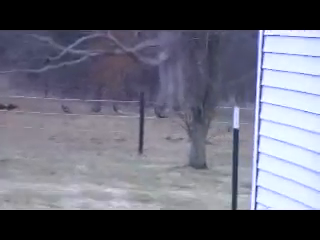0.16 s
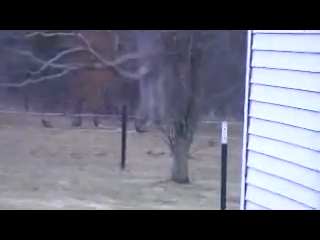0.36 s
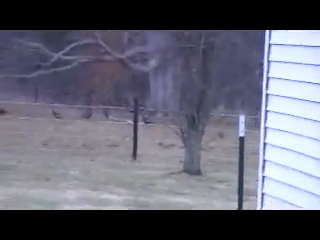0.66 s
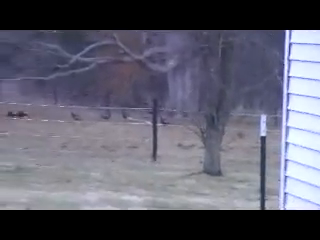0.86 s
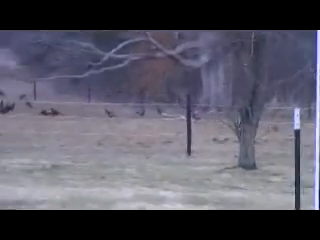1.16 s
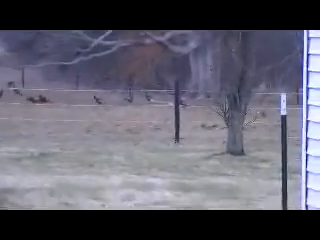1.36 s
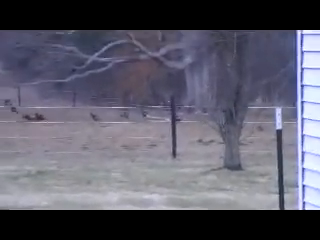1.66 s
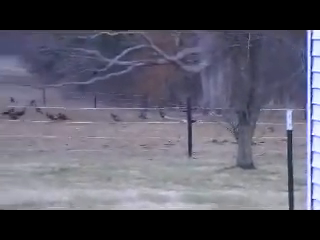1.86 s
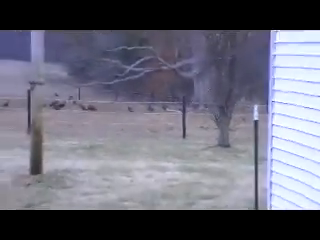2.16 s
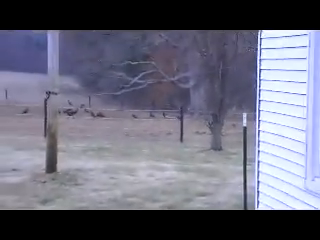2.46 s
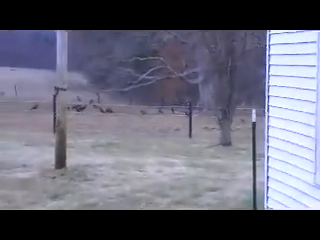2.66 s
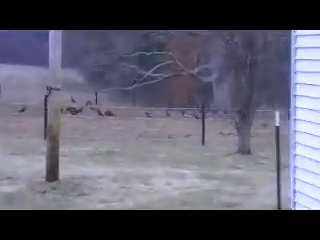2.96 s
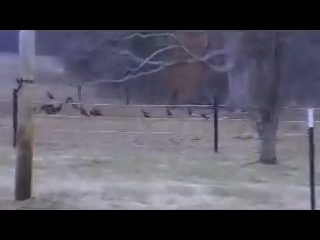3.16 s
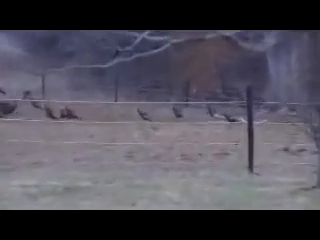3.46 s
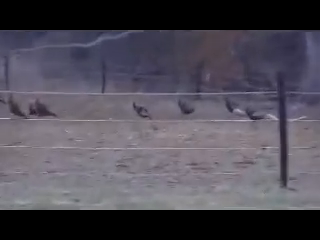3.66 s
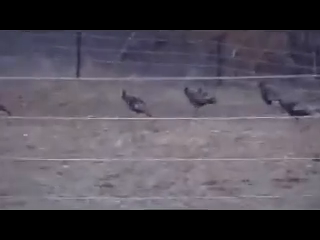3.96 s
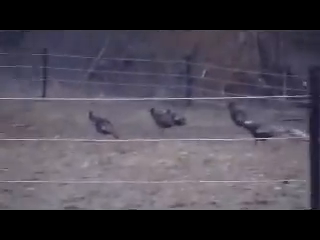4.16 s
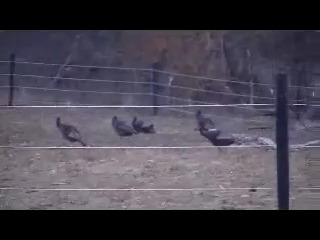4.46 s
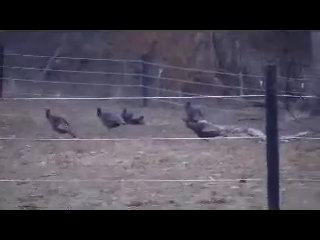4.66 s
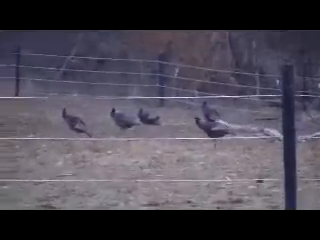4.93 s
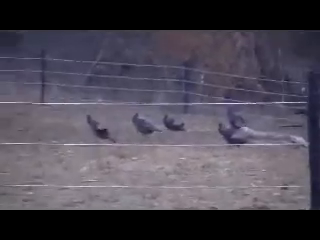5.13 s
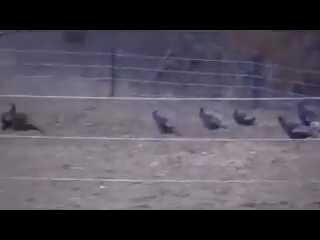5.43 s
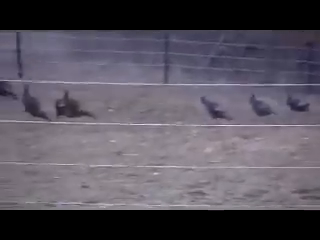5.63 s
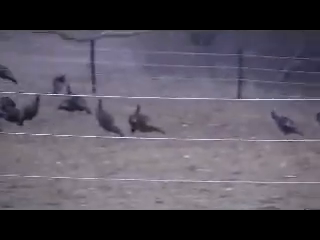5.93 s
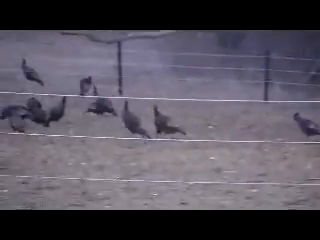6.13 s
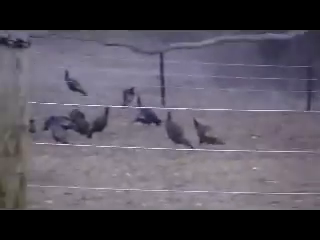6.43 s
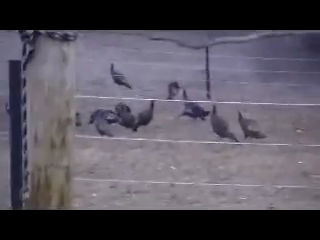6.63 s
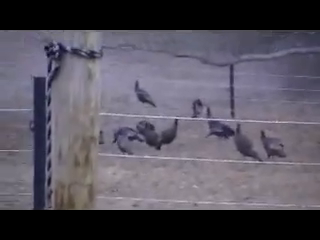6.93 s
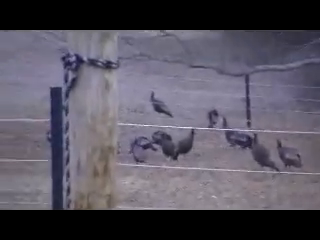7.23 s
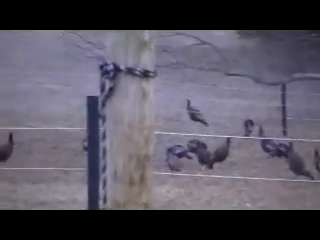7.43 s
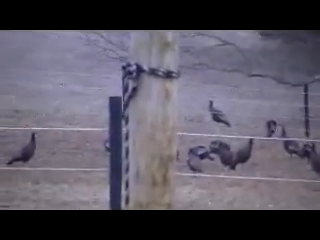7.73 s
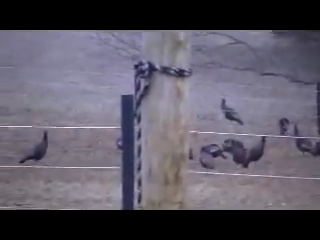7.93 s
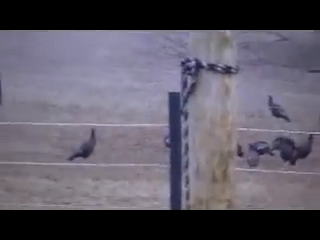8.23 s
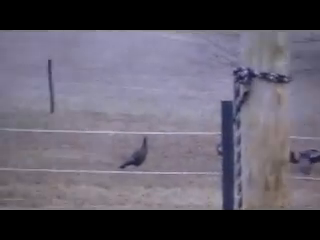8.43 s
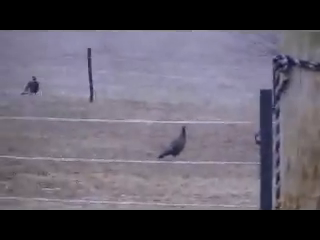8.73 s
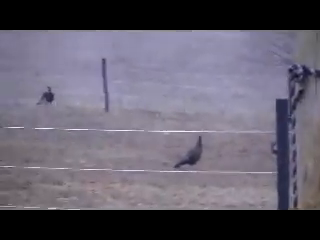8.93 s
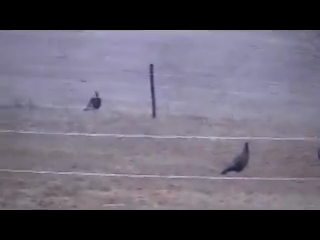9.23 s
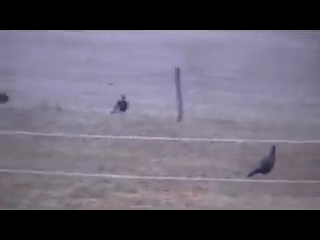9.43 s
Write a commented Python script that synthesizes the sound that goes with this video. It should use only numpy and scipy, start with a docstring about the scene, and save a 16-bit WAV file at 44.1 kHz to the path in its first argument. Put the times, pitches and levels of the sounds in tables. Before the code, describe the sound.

Far traffic, a low wavering machine drone and a faint electronic whine continue throughout, outdoors by a field. At the start, fingers rustle right at the microphone, and the camera case takes a short rattling knock at about 0.7 seconds. A soft distant tone sounds briefly near the beginning and again just after 3 seconds. From 1.3 seconds, turkeys yelp across the field: clear gliding notes break into hoarse rasps, about three a second, with a slight echo. A zoom motor chatters faintly from 3.5 to 4 seconds, and a few dry ticks sound close by, the sharpest around 4.8 seconds. Between 4.5 and 7.8 seconds the calls crowd together and grow louder, mixing short high notes, a couple of lower ones and rough yelps. Five fainter, evenly spaced rasps follow from about 7.9 to 9.5 seconds.

```python
"""Turkeys across a field, from a hand-held camera; far traffic, a machine drone and a faint whine throughout.
Right at the microphone, fingers rustle and the case is knocked (0.7 s). From 1.3 s the birds yelp: clear
gliding notes of the syrinx break into a hoarse rasp of pulses and breath. The zoom motor chatters
(3.5-4 s), dry ticks sound close by, and the calls crowd together (4.5-7.8 s). Five fainter rasps end it."""
import sys
import numpy as np
from scipy import signal
from scipy.fft import rfft, irfft, next_fast_len
from scipy.io import wavfile
from scipy.ndimage import uniform_filter1d, map_coordinates

SR = 44100
rng = np.random.default_rng(int(sys.argv[2]) if len(sys.argv) > 2 else 0)


def to_wav(sig):
    """Store sig (one row per channel, or 1-D mono) as 16-bit WAV at the path in sys.argv[1].

    Samples outside -1..1 are clipped; the rate is SR.
    """
    pcm = np.clip(np.atleast_2d(sig), -1, 1) * 32767
    pcm = np.round(pcm).astype(np.int16)
    wavfile.write(sys.argv[1], SR, pcm.T)  # frames by channels


N = 422919
TIME = np.arange(N) / SR


def amp(db):
    """Decibels to gain."""
    return 10 ** (np.asarray(db) / 20)


def unit(x):
    """Scaled to rms 1."""
    return x / np.sqrt(np.mean(x ** 2) + 1e-20)


def along(points, hz):
    """Interpolate (f/Hz, value) points on a log frequency axis."""
    f, v = np.transpose(points)
    return np.interp(np.log(hz + 1), np.log(f + 1), v)


def wobble(rate, size=N):
    """A smooth random curve, rate knots a second."""
    return map_coordinates(rng.standard_normal(int(N * rate / SR) + 4), [np.arange(size) * rate / SR])


def filtered(x, response):
    """Filter x by a complex response of frequency."""
    m = next_fast_len(x.shape[-1] + 8192)
    return irfft(rfft(x, m) * response(np.fft.rfftfreq(m, 1 / SR)), m)[..., :x.shape[-1]]


def resonances(modes):
    """Causal response of (f/Hz, width/Hz, gain/dB) modes, alternating in sign."""
    return lambda f: sum((-1) ** k * amp(db) * 1j * f * width / (hz * hz - f * f + 1j * f * width)
                         for k, (hz, width, db) in enumerate(modes))


def band(hz, width):
    """Response of one resonance applied twice: steep skirts."""
    return lambda f: resonances([(hz, width, 0)])(f) ** 2


def tone(hz, db):
    """A sine following a pitch curve, at an rms level."""
    return np.sqrt(2) * amp(db) * np.sin(2 * np.pi * np.cumsum(hz) / SR)


def add(track, start, sound):
    """Mix a sound in at start seconds."""
    part = track[round(start * SR):][:len(sound)]
    part += sound[:len(part)]


def fade(t, length, rise, fall):
    """Linear ramps in and out, times in seconds."""
    return np.clip(np.minimum(t / rise, (length - t) / fall), 0, 1)


def clear_notes(hoarseness=0.11, pitch_shake=0.006):
    """A turkey's syrinx vibrates evenly: four gliding partials, the upper ones hoarser."""
    # notes: t/s, length/s, first, middle and last f/Hz, level/dB ahead of the throat,
    # swell/dB from start to end, loss/dB from one partial to the next
    notes = [(1.317, 0.047, 1391, 1360, 1355, -51, 0, 12), (1.374, .036, 1092, 1130, 1100, -61, 0, 6),
             (1.408, 0.067, 1078, 1055, 1130, -52, -1.5, -0.5), (1.623, .014, 1900, 1890, 1880, -50, 0, 14),
             (1.633, .018, 1520, 1450, 1380, -46.5, 2, 14), (1.646, .047, 1376, 1360, 1346, -44.5, 2, 12),
             (1.695, .053, 1140, 1110, 1190, -48.5, -2, 5), (1.747, .05, 1366, 1353, 1350, -45, -1, 11.5),
             (1.978, .014, 1800, 1810, 1800, -44.5, 0, 14), (1.991, .0194, 1538, 1320, 1150, -40.5, 2, 8),
             (2.005, 0.019, 1550, 1516, 1490, -43.5, -1, 14),
             (2.007, 0.078, 915.8, 945, 960, -43.5, -3, -0.5), (2.077, .028, 968, 990, 1030, -47, -2, -2),
             (2.346, 0.018, 1450, 1340, 1290, -40.5, -1, 12), (2.693, .019, 1540, 1307, 1120, -37, 4, 9),
             (3.057, 0.017, 1500, 1310, 1213, -37.5, -3, 10), (3.391, .02, 1567, 1235, 950, -39.5, 2, 12),
             (4.49, 0.0257, 1536, 1520, 1500, -52, 0, 14), (4.52, 0.022, 1270, 1255, 1260, -48, 0, 12.5),
             (4.548, 0.065, 597, 583.4, 580, -46.5, -2, 3), (4.606, 0.045, 577.3, 565, 567, -32, 3, 14),
             (4.864, 0.0203, 1350, 1300, 1340, -41, 1, 10), (4.887, .024, 1400, 1317, 1330, -42, -6.5, 8),
             (5.178, 0.0303, 1480, 1420, 1284, -38.5, 0, 10), (5.206, 0.074, 590, 591.5, 614.5, -30, 3, 12),
             (5.288, .03, 1290, 1300, 1285, -47, 0, 16), (5.434, 0.027, 1490, 1465, 1440, -52, 0, 14),
             (5.452, .024, 1278, 1280, 1290, -49, 0, 14), (5.468, 0.023, 1410, 1390, 1440, -37.5, 5, 14.5),
             (5.493, .052, 1259, 1269, 1250, -41.5, -2, 15), (5.545, .059, 943, 937, 985, -43.5, 3, 1),
             (5.598, 0.027, 990, 1097, 1120, -46.5, -2, 3), (5.62, .028, 1270, 1320, 1406, -47, 2, 10),
             (5.748, .018, 1800, 1785, 1730, -44, 0, 14), (5.764, 0.03, 1550, 1450, 1460, -37, 5, 9),
             (5.776, .047, 1340, 1295, 1296, -33, -1, 11), (5.81, .14, 1282, 1313, 1369, -42.5, -2, 3.5),
             (5.83, 0.066, 1155, 1153, 1170, -55, 0, -2.5), (6.088, .023, 950, 956, 950, -35.5, 5, 6.5),
             (6.109, 0.02, 1190, 1155, 1140, -52, -1, -3.5), (6.113, 0.031, 1275, 1257, 1300, -33.5, 2, 10),
             (6.146, 0.048, 965, 935.7, 960, -40, -1, 0.5), (6.188, .054, 984, 973, 1050, -42.5, -4, -2),
             (6.15, 0.06, 1312, 1259, 1290, -44, -6, 7), (6.243, 0.02, 1390, 1350, 1340, -48, -1, 17),
             (6.384, .016, 1000, 1180, 1400, -49, 0, 14), (6.403, 0.03, 945, 964, 970, -37.5, 0, 15),
             (6.42, .02, 1290, 1258, 1290, -36.5, 0, 15), (6.438, 0.035, 1416, 1424, 1414, -43, 2.5, 16),
             (6.47, 0.0245, 1420, 1258, 1065, -37.5, 0, 10), (6.774, 0.02, 1547, 1361, 1260, -41.5, -1, 14),
             (6.785, .028, 1251, 1230, 1250, -34, -3, 13), (6.828, .035, 1254, 1263, 1290, -39.5, 0, 12),
             (7.083, .013, 1420, 1420, 1340, -38, 5, 14), (7.091, 0.0144, 1200, 1127, 1120, -34.5, 0, 4),
             (7.582, 0.071, 1500, 1330, 1350, -45, 4, 15), (7.649, 0.0192, 1555, 1623, 1700, -50.5, 0, 14),
             (7.75, .04, 774, 667, 640, -39, 0, 5.5), (7.79, .045, 1417, 1448, 1445, -43.5, -2, 16)]
    # the throat colours every partial: f/Hz, gain/dB
    throat = [(590, -39), (950, -6), (1200, 1), (1500, 1), (1900, -2.5), (2300, -4), (2800, -13.5),
              (3800, -25.5), (5200, -56)]
    out = np.zeros(N)
    shake, flutter = wobble(70), wobble(110)
    grit = [wobble(500) for _ in range(4)]
    for start, length, first_hz, middle_hz, last_hz, db, swell_db, loss_db in notes:
        t = np.arange(round(length * SR)) / SR
        progress = t / length
        span = slice(round(start * SR), round(start * SR) + len(t))
        hz = np.polyval(np.polyfit([0, .5, 1], [first_hz, middle_hz, last_hz], 2), progress)
        phase = 2 * np.pi * np.cumsum(hz * (1 + pitch_shake * shake[span])) / SR
        voice = np.zeros(len(t))
        for k in range(1, 5):
            gain = amp(along(throat, k * hz) - loss_db * (k - 1))
            voice += gain * (1 + hoarseness * k * grit[k - 1][span]) * np.sin(k * phase)
        level = amp(db + swell_db * (progress - .5) + 1.1 * flutter[span])
        add(out, start, np.sqrt(2) * voice * level * fade(t, length, rise=0.0045, fall=0.0036))
    return out


def rasps(pulse_hz=298, jitter=0.08, scatter_db=2.5, decay_db_per_s=28):
    """The hoarse yelp: uneven pulses and breath that swells once a cycle ring in the bird's throat."""
    # yelps: t/s, length/s, throat f/Hz, level/dB, brightness/dB, roughness (0-1)
    yelps = [(1.329, 0.1, 2500, -57.5, -16, 0.9), (2.359, 0.11, 1490, -38, -23.5, 0.68),
             (2.708, 0.098, 1490, -38, -20.5, 0.35), (3.069, 0.1, 1490, -37.5, -24, 0.47),
             (3.403, 0.1, 1429, -40, -31, 0.39), (4.865, 0.045, 1386, -42, -18, 0.6),
             (4.916, 0.086, 1190, -46.5, -23, 0.54), (5.181, 0.052, 1430, -42.5, -11, 0.61),
             (5.274, 0.058, 1180, -46.5, -37, 0.63), (5.477, 0.065, 1350, -40, -13, 0.63),
             (5.535, 0.091, 1140, -39.5, -26, 0.71), (5.78, 0.12, 1290, -39.5, -17, 0.79),
             (6.104, 0.1044, 1460, -38.5, -12, 0.6), (6.411, 0.083, 1340, -40.5, -10, 0.61),
             (6.488, 0.1, 1471, -37, -25, 0.43), (6.805, 0.096, 1420, -35.5, -29, 0.64),
             (7.098, 0.11, 1410, -34.5, -6.5, 0.8), (7.242, 0.1, 1607, -48, -32, 0.83),
             (7.585, 0.088, 1730, -48.5, -26.5, 0.7), (7.916, 0.11, 1530, -46, -18, 0.53),
             (8.307, 0.1, 1540, -46, -14, 0.56), (8.681, 0.11, 1550, -47, -13.5, 0.66),
             (9.039, 0.11, 1560, -47.5, -11.5, 0.6), (9.406, 0.11, 1522, -46, -13, 0.55)]
    # resonances either side of the throat's main one: f/Hz, width/Hz, gain/dB
    side_modes = [(900, 340, -10.5), (1810, 130, -12.5)]
    # upper throat resonances: f/Hz, width/Hz, gain/dB
    upper_modes = [(2230, 570, -13), (2880, 510, -17), (3410, 212, -10.5), (4110, 360, -24),
                   (5200, 900, -32)]
    out, t = np.zeros(N), np.arange(SR // 5) / SR
    flare_db = 7 * np.exp(-t / 0.02)  # the upper resonances flare as a yelp breaks
    flanks = lambda f: sum(amp(db) * band(hz, width)(f) for hz, width, db in side_modes)
    for start, length, throat_hz, db, bright_db, rough in yelps:
        cycle = np.cumsum(pulse_hz * (1 + jitter * rough * wobble(110, len(t)))) / SR
        pulse_size = amp(scatter_db * rough * wobble(204, len(t)))
        pulses = unit(np.diff(np.floor(cycle), prepend=0) * pulse_size)
        breath = unit(rng.standard_normal(len(t)) * np.exp(-0.6 * (cycle % 1)))
        source = np.sqrt(1 - rough) * pulses + np.sqrt(rough) * breath
        body = filtered(source, lambda f: band(throat_hz, width=584)(f) - flanks(f))
        upper = filtered(source, resonances(upper_modes)) * amp(bright_db + flare_db)
        envelope = amp(db - decay_db_per_s * t) * fade(t, length, rise=0.00306, fall=0.027)
        add(out, start, unit(body + upper) * envelope)
    return out


def echoes(calls):
    """Trees and a wall answer: each frequency dies at its own speed, with a separate tail each side."""
    # decay across the field: f/Hz, t60/s
    decay = [(500, 0.28), (1500, 0.52), (5000, 0.15)]
    hz, t, spectrum = signal.stft(rng.standard_normal((2, SR // 2)), SR, nperseg=256)
    tail = signal.istft(spectrum * amp(-60 * t / along(decay, hz)[:, None]), SR, nperseg=256)[1]
    return signal.fftconvolve(calls[None], tail / np.linalg.norm(tail[0]), axes=1)[:, :N]


def knock():
    """A knock and rattle on the camera: each blow cracks and rings the case a little differently."""
    # blows: t/s, relative level/dB
    blows = [(0.7276, -23.5), (0.7302, -18.5), (0.7343, -19), (0.7378, -16), (0.742, -20.5),
             (0.7483, -24.5), (0.78, -31), (0.786, -28), (0.799, -31), (0.812, -31), (0.828, -40)]
    # modes of the case: f/Hz, relative level/dB, t60/s
    modes = [(200, -29, 0.022), (315, 2.5, 0.016), (565, -1, 0.025), (770, 2, 0.017), (1160, 0, 0.041),
             (1664, 3, 0.018), (2810, -12, 0.03), (3330, -16, 0.021), (4630, -14.5, 0.029),
             (5880, -9, 0.018), (7900, -38.5, .015)]
    out, t = np.zeros(N), np.arange(SR // 10) / SR
    attack = 1 - np.exp(-t / 0.00016)
    for start, db in blows:
        ring = np.zeros(len(t))
        for hz, mode_db, t60 in modes:
            envelope = amp(mode_db + rng.normal(0, 1.9) - 60 * t / t60)
            ring += envelope * np.sin(2 * np.pi * hz * rng.normal(1, 0.038) * t)
        crack = 0.098 * amp(-60 * t / 0.0041) * rng.standard_normal(len(t))
        add(out, start, amp(db - 8.5) * (ring * attack + crack))
    return out


def ticks():
    """Dry ticks of the camera: a snap and its trail of noise in one broad resonance."""
    # snaps: t/s, peak level/dB, centre f/Hz, width/Hz
    snaps = [(.0703, -44, 6500, 6000), (.449, -47, 7500, 8000), (.8165, -45, 7000, 6000),
             (4.209, -51, 6500, 3000), (4.7058, -35, 7500, 4000), (4.7141, -47, 6500, 3000),
             (4.7505, -47, 8400, 4000), (4.8223, -35, 2600, 3800), (4.8255, -31, 2500, 3800),
             (8.79, -54, 7500, 3000)]
    out, t = np.zeros(N), np.arange(SR // 10) / SR
    for start, db, hz, width in snaps:
        trail = 0.08 * amp(-60 * t / 0.0128) * rng.standard_normal(len(t))
        tick = filtered((t == 0) + trail, band(hz, width))
        add(out, start, amp(db) * tick / np.abs(tick).max())
    return out


def rustle():
    """Fingers rub the case: grainy noise in strokes that rise fast and fall slowly."""
    # strokes: t/s, length/s, level/dB
    strokes = [(0, 0.038, -53.5), (0.38, 0.37, -56), (0.724, 0.074, -43), (0.789, 0.095, -47),
               (9.05, .22, -67)]
    # friction spectrum: f/Hz, relative density/dB
    friction = [(300, 0), (1500, 7.5), (4000, -1), (9000, -5.5), (12000, -16), (13000, -24)]
    grains = rng.standard_normal(N) * amp(2.8 * wobble(300))
    rub = unit(filtered(grains, lambda f: amp(along(friction, f))))
    return rub * sum(amp(db) * fade(TIME - start, length, rise=0.096 * length, fall=0.67 * length)
                     for start, length, db in strokes)


def zoom_motor(db=-62.5):
    """Each step of the zoom motor is a short whirr of noise ringing in the gears."""
    # motor steps: t/s
    steps = [3.489, 3.587, 3.632, 3.73, 3.782, 3.833, 3.88, 4.04]
    # gear resonances: f/Hz, width/Hz, gain/dB
    gears = [(3390, 210, 1), (5900, 320, -2.5), (9360, 2200, -9.5)]
    out, t = np.zeros(N), np.arange(SR // 10) / SR
    envelope = amp(db) * fade(t, 0.021, rise=0.0055, fall=0.0126)
    for step in steps:
        whirr = unit(filtered(rng.standard_normal(len(t)), resonances(gears)))
        add(out, step - 0.008, whirr * envelope)
    return out


def whine():
    """The camera's electronics give three faint, steady harmonics."""
    # harmonics: f/Hz, level/dB
    harmonics = [(2185.5, -68.5), (4371, -81), (6557, -83.5)]
    return sum(np.sqrt(2) * amp(db) * np.sin(2 * np.pi * hz * TIME) for hz, db in harmonics)


def machine_drone():
    """A far machine: two wavering low tones over hums of narrow-band noise."""
    # course of the tones: t/s, high f/Hz, high level/dB, low f/Hz, low level/dB
    course = [(0, 98.1, -57.5, 67, -51.5), (2, 99.3, -51, 65.1, -55), (4.2, 101.1, -46.5, 63.8, -50.5),
              (5.4, 102, -45.5, 64.5, -53.5), (6.5, 104.4, -46.5, 62.9, -55.5), (8, 102.6, -50, 61, -62),
              (9.59, 100.1, -51.5, 62, -53)]
    # blurred hums: f/Hz, width/Hz, level/dB
    hum_bands = [(146.3, 25, -55.5), (238.4, 4.05, -60.5), (552, 77, -57.5), (812.5, 72.7, -59)]
    times, *columns = np.transpose(course)
    high_hz, high_db, low_hz, low_db = [np.interp(TIME, times, column) for column in columns]
    high = tone(high_hz + 0.5 * wobble(6), high_db + 1.1 * wobble(5.5))
    low = tone(low_hz + 1.67 * wobble(7.9), low_db + 1.6 * wobble(5))
    hums = sum(amp(db) * unit(filtered(rng.standard_normal(N), band(hz, width)))
               for hz, width, db in hum_bands)
    return high + low + hums


def far_moan():
    """A soft, wavering tone comes and goes in the distance."""
    # moans: t/s, length/s, f/Hz, level/dB
    moans = [(.145, .49, 578, -50), (3.12, .23, 580, -52), (3.455, .12, 577, -54)]
    return sum(tone(hz + 4 * wobble(14), db + 1.2 * wobble(27.1))
               * fade(TIME - start, length, rise=0.011, fall=0.017) for start, length, hz, db in moans)


def traffic_and_hiss(db=-45, patchy_db=1.08):
    """Far traffic and microphone hiss: faintly patchy noise, wider in stereo towards the treble."""
    # noise spectrum: f/Hz, relative density/dB
    density = [(18, -39), (36, -30), (52, -9), (108, -4), (175, -11.5), (232, -7.5), (324, -11.5),
               (584, -10), (1470, -16), (2040, -22.5), (2260, -25), (2570, -29), (8570, -38.5),
               (11400, -44), (13600, -44)]
    # likeness of left and right: f/Hz, correlation (0-1)
    likeness = [(60, 0.88), (120, 0.82), (230, 0.71), (450, 0.691), (890, 0.62), (1740, 0.61),
                (3000, 0.226), (4000, 0.16)]
    spectrum = signal.stft(rng.standard_normal((2, N)), nperseg=512)[2]
    patches = uniform_filter1d(rng.standard_normal(spectrum.shape[1:]), 6, axis=0)
    patches = uniform_filter1d(patches, 14, axis=1)
    noise = signal.istft(spectrum * amp(patchy_db * unit(patches)), nperseg=512)[1][:, :N]
    spread = lambda f: np.arccos(along(likeness, f)) / 2
    mid, side = filtered(noise, lambda f: amp(along(density, f)) * [np.cos(spread(f)), np.sin(spread(f))])
    return amp(db) * unit(np.array([mid + side, mid - side]))


def scene(air_cutoff_hz=5800, bass_cutoff_hz=190):
    """Birds dulled by the air over the field, the far background, and the camera's own close sounds."""
    birds = filtered(clear_notes() + rasps(), lambda f: 1 / np.sqrt(1 + (f / air_cutoff_hz) ** 8))
    field = birds + amp(-16) * echoes(birds) + traffic_and_hiss()
    drone = (machine_drone() + far_moan()) * amp([[-.3], [.3]])  # a touch to the right
    camera = knock() + ticks() + zoom_motor() + rustle() + whine()
    # the close sounds pass a steep bass cut and feed both channels alike
    close_sounds = filtered(camera, lambda f: (1j * f / (bass_cutoff_hz + 1j * f)) ** 2)
    return field + drone + close_sounds


def record(dry):
    """The finished stereo sound: mono above 4 kHz; the treble fades above 11 kHz and stops at 13.7 kHz."""
    # fade of the top treble: f/Hz, gain/dB
    treble_fade = [(11300, 0), (12300, -11.5), (13600, -18)]
    mono_hz, top_hz = 3980, 13738
    mid = filtered(dry.mean(axis=0), lambda f: amp(along(treble_fade, f)) * (f < top_hz))
    side = filtered((dry[0] - dry[1]) / 2, lambda f: f < mono_hz)
    return np.array([mid + side, mid - side])


dry = scene()
out = record(dry)
to_wav(out)
```